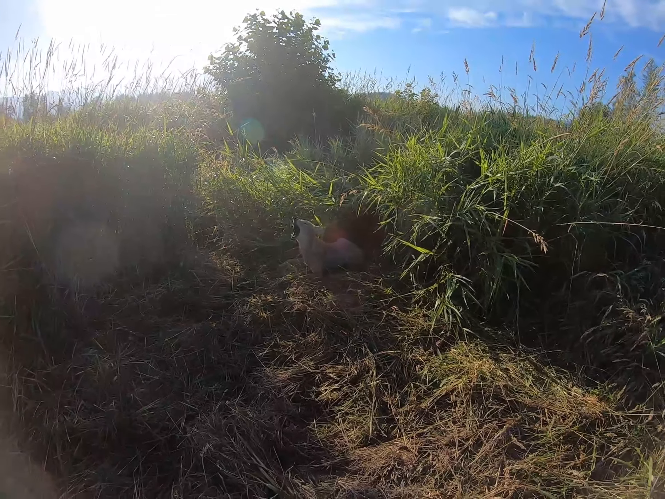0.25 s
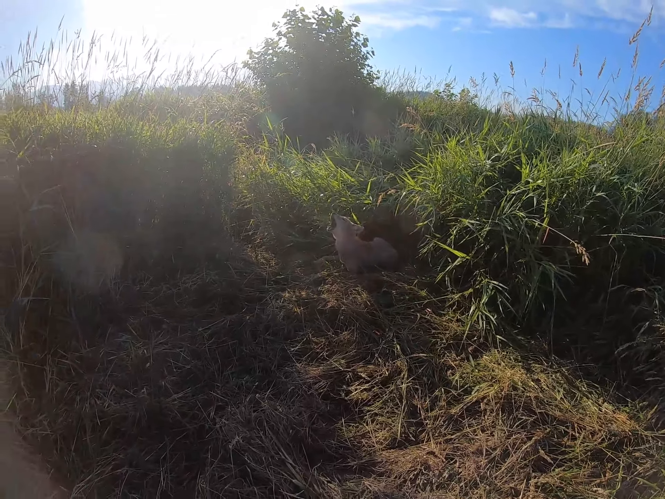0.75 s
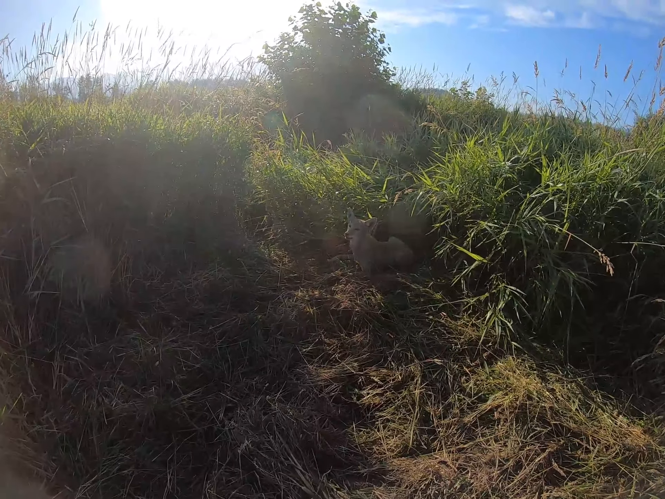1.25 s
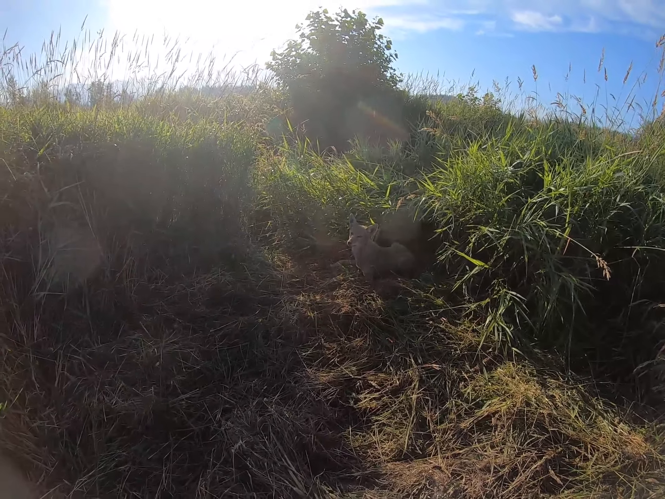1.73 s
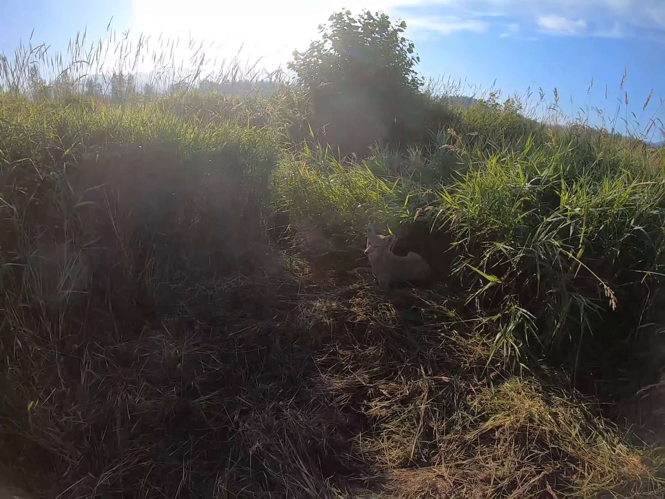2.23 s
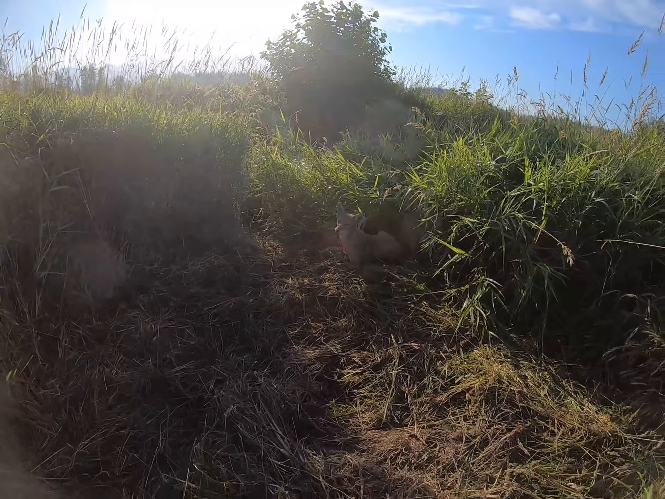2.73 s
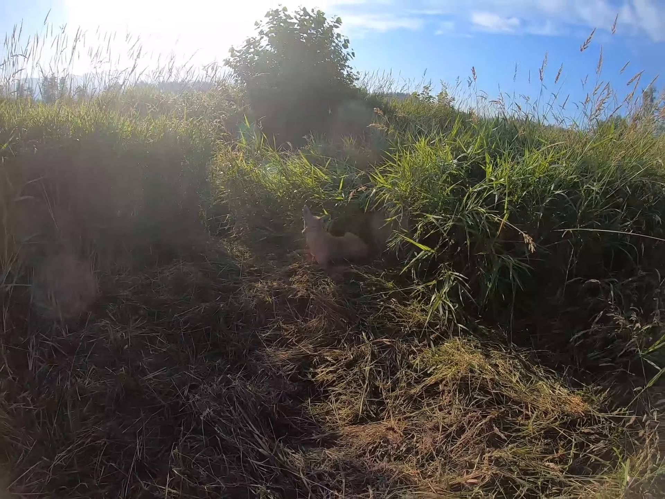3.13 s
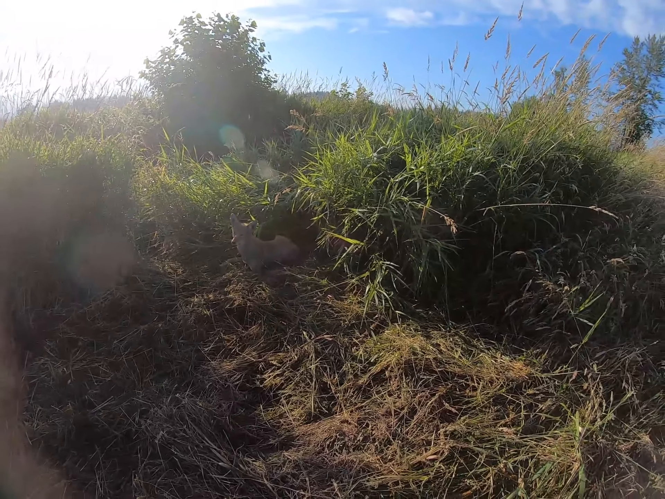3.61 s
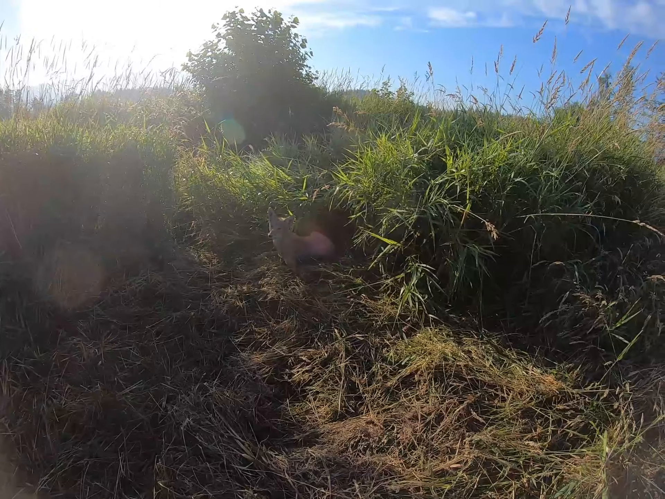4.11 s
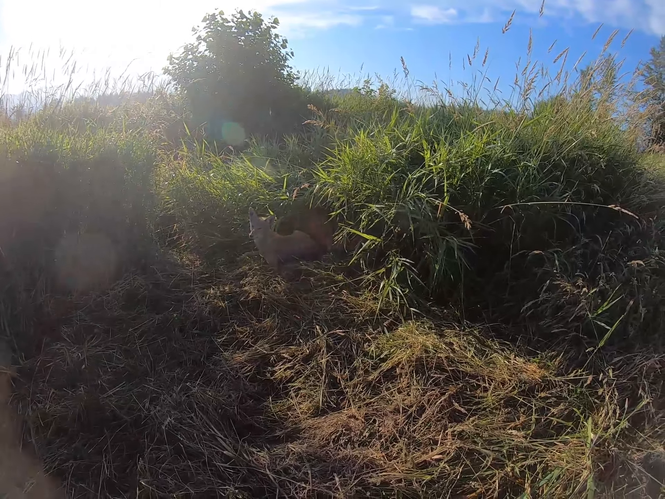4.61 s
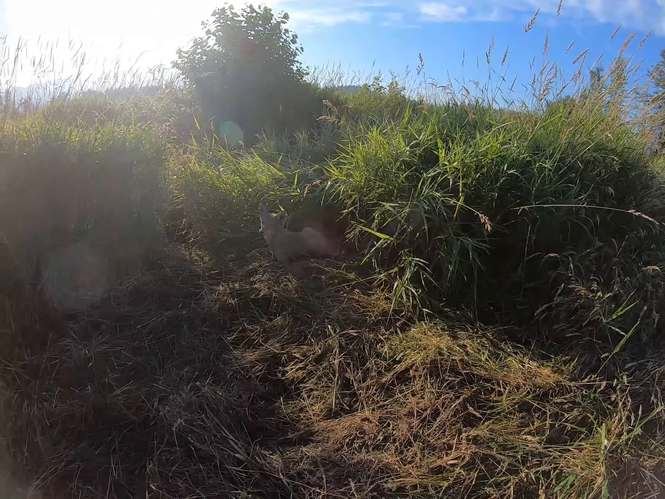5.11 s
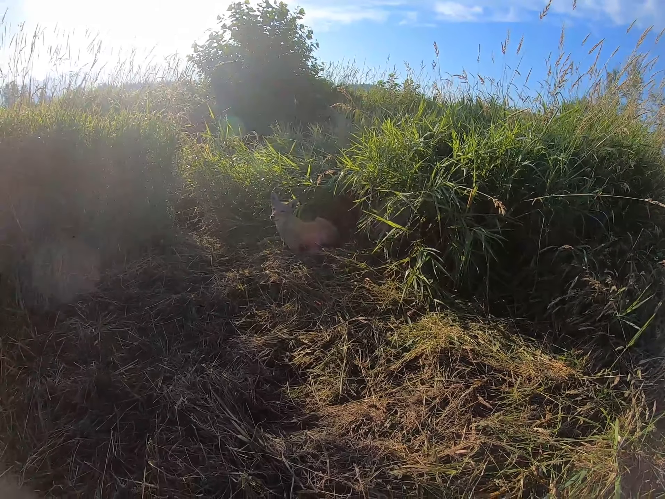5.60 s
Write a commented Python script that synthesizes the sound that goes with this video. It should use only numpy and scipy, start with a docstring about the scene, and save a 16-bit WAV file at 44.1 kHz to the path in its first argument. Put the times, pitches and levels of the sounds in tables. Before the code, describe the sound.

A nearby coyote ends a high howl with a falling yodel, then clicks, thumps and rubbing of a handled microphone follow in a quiet field.

```python
"""Tall grass in an open field, a small hand-held camera, a coyote a few metres off. It ends a howl with
a yodel, its harmonics jumping between registers, and the hedges return a faint echo. Right at the
microphone the hand shifts: skin rubs and ticks on the case, thumps and rumble come through the body.
Far off, animals howl and birds chirp over the hiss of the field; a low hum glides in at the end.
The camera fades between one centred channel and its two microphone ports."""
import sys
import numpy as np
from scipy import signal
from scipy.fft import rfft, irfft
from scipy.io import wavfile
from scipy.ndimage import uniform_filter1d

SR = 44100
rng = np.random.default_rng(int(sys.argv[2]) if len(sys.argv) > 2 else 0)


def to_wav(sig):
    """Store sig (one row per channel, or 1-D mono) as 16-bit WAV at the path in sys.argv[1].

    Samples outside -1..1 are clipped; the rate is SR.
    """
    pcm = np.clip(np.atleast_2d(sig), -1, 1) * 32767
    pcm = np.round(pcm).astype(np.int16)
    wavfile.write(sys.argv[1], SR, pcm.T)  # frames by channels


N = 258137

# The camera's fade. Each row: time in seconds, share of the two ports from 0 to 1.
PORT_SHARE = [(0, 0), (.45, 0), (1.2, 0.35), (1.7, 1), (2.45, 0.03), (4.5, 0), (5.0, 0.56), (5.3, 0.97)]
# The coyote's arcs of pitch, each lasting until the next.
# Each row: start in seconds, pitch at start, middle and end in Hz, effort in dB.
HOWL_ARCS = [(0, 835, 874, 922, 4), (.064, 1206, 1246, 1233, 4.5), (.503, 1234, 1264, 1238, 1),
             (.559, 1238, 1256, 1216, 0), (.641, 1216, 1240, 1256, 0), (.672, 1256, 1266, 1247, -3.5),
             (.727, 1247, 1190, 1158, -.5), (.77, 1158, 1170, 1196, -.5), (.85, 1196, 1162, 1070, 1.5),
             (.899, 745, 690, 600, -2), (.943, 562, 553, 550, 0), (.969, 636, 652, 680, 0),
             (1.008, 807, 898, 775, .5), (1.059, 750, 655, 499, 2), (1.086, 490, 345, 300, 0)]
# The throat favours the 1st or 2nd harmonic: pitches in Hz, then each one's gain there in dB.
THROAT_HZ = [300, 400, 500, 555, 600, 680, 745, 810, 910, 1070, 1155, 1195, 1260]
FIRST_DB = [-55, -43.5, -34, -26, -24, -11.5, -19.5, -25, -26.5, -18.5, -11.5, -13, -11.5]
SECOND_DB = [-48, -32, -35.5, -16, -24, -37, -32, -14.5, -17, -17, -27.5, -28, -36.5]
# The voice from the 3rd harmonic up. Each row: frequency in Hz, relative level in dB.
OVERTONES = [(1600, -21.5), (2200, -12), (2700, -24.5), (3480, -51.5), (3720, -41.5), (5000, -52.5),
             (6200, -49), (7400, -60), (8700, -53), (11300, -88), (13700, -78), (16500, -94.5)]
HOWL_END_S, JUMP_S, RASP_S, RASP_DB = 1.15, .006, 1.07, 14
BREATH_DB, AIR_DB, YODEL_EDGE_DB, THINNING_DB_PER_S = -41, -60.5, 14, 24.5
# Spectrum of the far hiss. Each row: frequency in Hz, relative level in dB.
FIELD_SPECTRUM = [(60, -24), (150, 6), (750, 0), (2300, -10), (6660, -29), (13000, -72)]
# Jolts to the camera body. Each row: start in seconds, hold in seconds, relative level in dB.
JOLTS = [(0.48, 0.031, -41.5), (1.173, 0.17, -40), (1.805, 0.0094, -21.5), (2.663, 0.052, -38.5),
         (2.921, 0.031, -31.5), (3.351, 0.023, -30), (3.708, 0.023, -28.5), (4.1, 0.089, -38.5),
         (4.523, 0.12, -42), (4.747, 0.11, -30), (5.024, 0.11, -39), (5.258, 0.2, -35.5),
         (5.628, 0.036, -35)]
JOLT_RISE_DB_PER_S, JOLT_FALL_DB_PER_S, STILL_DB = 597, 148.5, -61.5
# The resting hand's faint rubbing. Each row: time in seconds, relative level in dB.
RESTING_HAND = [(1.1, -59.5), (1.45, -73.5), (2.45, -68), (2.8, -60.5), (3.55, -53), (4.15, -47),
                (4.35, -60), (5.2, -58), (5.86, -43.5)]
# Skin swishing over the case.
# Each row: start and length in seconds, relative treble and midrange levels in dB.
SWISHES = [(1.29, 0.035, -56.5, -43.5), (1.823, 0.054, -44.5, -33.5), (1.957, 0.076, -66, -57.5),
           (2.591, 0.075, -56, -65.5), (2.844, 0.13, -54.5, -51), (2.991, 0.018, -35.5, -31),
           (3.347, 0.034, -37.5, -41), (3.688, 0.063, -60, -49), (3.902, 0.072, -43.5, -47),
           (4.2, 0.045, -40.5, -44), (4.26, 0.02, -45, -40), (4.538, 0.049, -45.5, -47),
           (4.673, 0.1, -40.5, -41.5), (4.797, 0.044, -41, -41.5), (4.977, 0.018, -46.5, -40.5),
           (5.084, 0.083, -45.5, -39.5), (5.238, 0.023, -48.5, -37.5), (5.291, 0.1476, -41, -37.5),
           (5.441, 0.16, -33, -34.5), (5.603, 0.11, -50, -44.5), (5.685, 0.084, -42, -37),
           (5.802, 0.055, -52, -45)]
# Ticks on the case. Each row: start in seconds, relative treble and midrange levels in dB.
TICKS = [(1.3634, -42, -32.5), (1.436, -51.5, -63), (1.5488, -55, -65), (1.7401, -44.5, -41),
         (1.8176, -16.5, -20.5), (1.8497, -17.5, -5.5), (1.8564, -14.5, -46), (1.8622, -23.5, -36),
         (1.883, -31, -53.5), (1.9143, -42.5, -58), (2.0562, -44.5, -75.5), (2.211, -49, -61),
         (2.9375, -29, -29.5), (3.0002, -41, -39), (3.07, -38.5, -39.5), (3.1463, -35, -31.5),
         (3.264, -32, -36), (3.7, -30.5, -28.5), (3.765, -32, -30), (4.108, -34, -41),
         (4.122, -25.5, -34.5), (4.146, -38, -29), (4.161, -33, -52), (4.2083, -17, -28.5),
         (4.4436, -38, -36.5), (4.5695, -26, -45), (4.812, -23, -57), (5.315, -26.5, -38),
         (5.3735, -23.5, -35), (5.3803, -24, -46), (5.4364, -22, -33), (5.688, -35, -26),
         (5.7404, -36, -51), (5.822, -35, -51)]
# Resonances of the case at centre and left, of the case on the right, and of the body.
# Each row: frequency in Hz, width in Hz, relative level in dB.
CASE_MODES = [(2401, 760, 0.5), (3870, 1200, -3.5), (6850, 440, -16.5), (8440, 600, -13.5),
              (9520, 1000, -13.5), (12600, 3200, -50)]
RIGHT_MODES = [(2823, 580, -8), (4070, 240, -10), (4996, 1300, -10.5), (6238, 740, -6), (6840, 470, -0.5),
               (9710, 1750, -12), (11700, 570, -21.5)]
BODY_MODES = [(218.4, 434, 3), (656.5, 475, 3.5), (1282, 1020, -5.5)]
CORE_NARROWER, CORE_DB = 7, 6  # each resonance has a thin core that rings on
# Far animals. Each row: start and length in seconds, pitch at start and end in Hz, level in dB.
FAR_HOWLS = [(1.12, .63, 1240, 1140, -67), (1.14, .22, 2440, 2500, -67), (1.48, .27, 1720, 1690, -69),
             (1.9, .5, 760, 750, -70), (1.94, .34, 2340, 2310, -69), (2.2, .6, 1200, 1380, -72),
             (2.4, .88, 850, 870, -66), (3.47, .25, 1040, 1060, -57)]
# Thuds through the body. Each row: start in seconds, starting level in dB, pitch in Hz.
THUDS = [(1.368, -25, 197), (1.845, -7.5, 108), (4.119, -13, 222), (4.836, -17.5, 221), (5.254, -25, 294)]
# Far birds. Each row: start and length in seconds, pitch at start, middle and end in Hz, level in dB.
BIRDS = [(2.02, .065, 3280, 3700, 4700, -76), (2.245, .115, 5800, 4300, 2950, -78),
         (3.49, .11, 6000, 5720, 5800, -74), (1.61, .065, 3280, 3700, 4700, -77)]
# The low hum. Each row: time in seconds, pitch in Hz, base level in dB.
HUM = [(5.28, 74.2, -49), (5.35, 91.4, -37), (5.41, 78.9, -40), (5.5, 62.3, -58), (5.86, 69.6, -40.5)]
# Its first three harmonics, in dB above the base level.
HUM_HARMONICS_DB = [-21, 5.5, -1]


def undb(db):
    """Decibels to gain."""
    return 10 ** (np.asarray(db) / 20)


def unit(x):
    """Scaled to rms 1."""
    return x / np.sqrt(np.mean(x ** 2))


def band(x, lo_hz, hi_hz, order=2):
    """Band-pass."""
    return signal.sosfilt(signal.butter(order, [lo_hz, hi_hz], "band", fs=SR, output="sos"), x)


def hiss(lo_hz, hi_hz):
    """A steep-sided band of noise."""
    return band(rng.standard_normal(N), lo_hz, hi_hz, order=4)


def walk(rate):
    """A line through random values, rate of them a second; rms 1."""
    step = int(SR / rate)
    held = np.repeat(rng.standard_normal(N // step + 1), step)
    return unit(uniform_filter1d(held, step)[:N])


def curve(rows):
    """A gate that is open while a table lasts, then its columns on the sample grid."""
    s, *columns = np.transpose(rows)
    gate = np.interp(T, [s[0] - .012, s[0], s[-1], s[-1] + .012], [0, 1, 1, 0])
    return gate, *(np.interp(T, s, c) for c in columns)


def arc(u, start, middle, end):
    """Parabola through three values, u from 0 to 1."""
    return start * (1 - u) * (1 - 2 * u) + 4 * middle * u * (1 - u) + end * u * (2 * u - 1)


def throat():
    """The coyote's gate, pitch and two lowest harmonics in dB; the voice dips as the pitch jumps."""
    s, start, middle, end, effort = np.transpose(HOWL_ARCS)
    edges = np.append(s, HOWL_END_S)
    k = np.clip(np.searchsorted(edges, T, side="right") - 1, 0, len(s) - 1)
    u = np.clip((T - edges[k]) / np.diff(edges)[k], 0, 1)
    glide = lambda x: uniform_filter1d(x, int(JUMP_S * SR), mode="nearest")
    hz = glide(arc(u, start[k], middle[k], end[k]))
    jump_speed = glide(np.abs(np.gradient(np.log(hz))) * SR)
    push_db = np.interp(T, s, effort) - .1 * jump_speed
    thinning_db = THINNING_DB_PER_S * T * np.clip((hz - 1150) / 50, 0, 1)  # high register only
    first_db = push_db + np.interp(hz, THROAT_HZ, FIRST_DB)
    second_db = push_db + np.interp(hz, THROAT_HZ, SECOND_DB) - thinning_db
    gate = np.clip((HOWL_END_S + .0131 - T) / .0087, 0, 1)
    return gate, hz, first_db, second_db


def coyote(ports):
    """A few metres off: a clean stack of harmonics with a little breath, and its echo."""
    gate, hz, first_db, second_db = throat()
    phase = 2 * np.pi * np.cumsum(hz * (1 + .002 * walk(40))) / SR
    low = np.sqrt(2) * (undb(first_db) * np.sin(phase) + undb(second_db) * np.sin(2 * phase))
    loudness = np.hypot(undb(first_db), undb(second_db))
    waver_db = [3 * walk(40) + 2.5 * walk(250) for _ in range(15)]
    # The top of the low register is harsher around 6 kHz.
    edge_db = YODEL_EDGE_DB * np.clip(np.minimum(1100 - hz, hz - 700) / 100, 0, 1)
    tiring = np.interp(T, [0, .9], [2.5, -3])  # duller above 2.4 kHz as the effort drops
    high = 0
    for k in range(3, 15):
        db = np.interp(k * hz, *np.transpose(OVERTONES)) + waver_db[k]
        db += edge_db * np.exp(-((k * hz - 6100) / 1000) ** 2)
        db += tiring * np.sqrt(np.maximum(k * hz / 1000 - 2.4, 0))
        high += undb(db) * np.sin(k * phase)
    rasp_db = RASP_DB * np.clip((T - RASP_S) / .04 + .5, 0, 1)  # the voice breaks up as it falls
    breath = undb(BREATH_DB + rasp_db) * unit(hiss(900, 3100))
    voice = gate * (low + loudness * breath)
    hoarse_db = rasp_db + np.interp(T, [.88, 1.01], [-60, -43])  # air hisses most in the yodel
    hoarse = undb(hoarse_db) * unit(hiss(5200, 7000) + .5 * hiss(8200, 9400))
    air = undb(AIR_DB) * unit(hiss(3400, 6400))
    treble = gate * loudness * (high + hoarse + air)
    side = ports * np.array([[-1], [1]])  # the right port is the louder, most in the treble
    return voice * (1 + .45 * side) + treble * (1 + .6 * side) + hedge_echo(voice + treble, ports)


def hedge_echo(call, ports, level_db=-19.5, t60_s=.12):
    """Scattered reflections off the hedges, dying away at each port."""
    t = np.arange(int(t60_s * SR)) / SR
    tail = rng.standard_normal((2, len(t))) * undb(-60 * t / t60_s) * np.minimum(t / .03, 1)
    tail /= np.sqrt(np.sum(tail ** 2, axis=1, keepdims=True))
    left, right = signal.fftconvolve(call[None], undb(level_db) * tail)[:, :N]
    return np.array([left, left + ports * (right - left)])


def field_hiss(ports):
    """The far hiss of the open field, fainter under the start of the howl."""
    hz, db = np.transpose(FIELD_SPECTRUM)
    shape = undb(np.interp(np.log(np.fft.rfftfreq(N, 1 / SR) + 1), np.log(hz), db))
    mid, side = (unit(irfft(rfft(rng.standard_normal(N)) * shape, N)) for _ in range(2))
    level_db = -66.5 + np.interp(T, [.4, .6], [-9, 0]) + walk(24)
    return undb(level_db) * (mid + .88 * ports * side * np.array([[1], [-1]]))


def body_rumble(ports):
    """Jolts shake the camera body: each rumble rises fast, holds and dies away."""
    jolts_db = [db - JOLT_RISE_DB_PER_S * np.maximum(s - T, 0)
                - JOLT_FALL_DB_PER_S * np.maximum(T - s - hold, 0) for s, hold, db in JOLTS]
    swell = undb(np.maximum(np.max(jolts_db, axis=0), STILL_DB) + 2 * walk(11))
    noise = np.sign(rng.standard_normal((2, N)))
    shared = swell * unit(band(noise[0], 9.2, 59))
    opposed = swell * unit(band(noise[1], 7.1, 110))
    pair = np.array([.5 * shared + opposed, 2.2 * shared - .99 * opposed])
    return (1 - ports) * shared + ports * pair


def hand_on_case(ports):
    """Right at the microphone: skin sticks and slips, and slips and ticks ring the same modes."""
    gate, rest_db = curve(RESTING_HAND)
    noise = np.sign(rng.standard_normal((3, N)))
    slip = unit(undb(2.6 * walk(45) + 1.5 * walk(300)))
    releases = (rng.random(N) < 70 / SR) * undb(16 + 2.5 * rng.exponential(size=N))
    crackle = signal.lfilter([1], [1, -.97], releases)
    rest = gate * undb(rest_db + 2.5 * walk(14))
    treble = (slip * swishes(column=2) * (1 + .15 * crackle) + undb(-16.5) * rest * crackle) * noise[0]
    treble += .95 * band(ticks(column=1, t60_s=.012) * noise[0], 1700, 8700)  # nail or stalk: duller
    treble += undb(-8.5) * band(rest * noise[2], 1300, 4900)  # the resting hand sounds dull
    treble = band(treble, 300, 13000)
    midrange = slip * swishes(column=3) + rest + 1.69 * ticks(column=2, t60_s=.015)
    case = ring(treble, CASE_MODES)
    body = ring(midrange * noise[1], BODY_MODES)
    body_right = ring(midrange * (.082 * noise[1] + noise[2]), BODY_MODES)
    left = undb(-1) * case + undb(9) * band(treble, 8300, 9900) + .65 * body
    right = undb(10.5) * ring(treble, RIGHT_MODES) + .65 * body_right
    return (1 - ports) * (case + body) + ports * np.array([left, right])


def ring(drive, modes):
    """The camera's resonances, neighbours in opposite phase; white noise keeps its level."""
    kick = np.eye(1, 4096)[0]
    mode = lambda hz, width: band(kick, hz - width / 2, hz + width / 2, order=1)
    response = sum((-1) ** k * undb(db) * (mode(hz, w) + undb(CORE_DB) * mode(hz, w / CORE_NARROWER))
                   for k, (hz, w, db) in enumerate(modes))
    return signal.fftconvolve(drive, response / np.sqrt(np.sum(response ** 2)))[:N]


def far_call(u, hz, db):
    """One distant tone that swells and fades as u runs from 0 to 1."""
    swell = np.sqrt(np.abs(np.sin(np.pi * u))) * (u < 1)
    return swell * undb(db) * np.sin(2 * np.pi * np.cumsum(hz) / SR)


def far_howls():
    """Animals far off, hoarse with distance: wavering tones, each blurred into a narrow band."""
    out = 0
    for s, length, start, end, db in FAR_HOWLS:
        u = np.clip((T - s) / length, 0, 1)
        hz = (start + (end - start) * u) * (1 + .016 * walk(70))
        out += far_call(u, hz, db + 5 * walk(70))
    return out


def swishes(column, rise_s=.013, fade_s=.003):
    """Envelope of skin sliding over the case: a soft start, a hold, a trailing fade."""
    held = sum(undb(row[column]) * ((T > row[0]) & (T < row[0] + row[1])) for row in SWISHES)
    pole, rise = np.exp(-1 / fade_s / SR), int(rise_s * SR)
    return signal.lfilter([1 - pole], [1, -pole], uniform_filter1d(uniform_filter1d(held, rise), rise))


def ticks(column, t60_s):
    """Envelope of the ticks on the case: a sudden start and a quick fade."""
    rows = np.array(TICKS)
    hits = np.zeros(N)
    np.add.at(hits, (rows[:, 0] * SR).astype(int), undb(rows[:, column]))
    return signal.lfilter([1], [1, -undb(-60 / t60_s / SR)], uniform_filter1d(hits, size=60))


def thumps(t60_s=.029):
    """Thuds reach the microphone as damped swings of the camera body."""
    out = 0
    for s, db, hz in THUDS:
        age = np.maximum(T - s, 0)
        out += undb(db - 60 * age / t60_s) * np.sin(2 * np.pi * hz * age)
    return out


def far_birds():
    """Short gliding whistles; distance and leaves make the level flicker."""
    out = 0
    for s, length, start, middle, end, db in BIRDS:
        u = np.clip((T - s) / length, 0, 1)
        out += far_call(u, arc(u, start, middle, end), db + 5 * walk(90))
    return out


def low_hum():
    """Three harmonics on a low, gliding pitch."""
    gate, hz, db = curve(HUM)
    phase = 2 * np.pi * np.cumsum(hz) / SR
    harmonics = sum(undb(db + d) * np.sin(k * phase) for k, d in enumerate(HUM_HARMONICS_DB, 1))
    return np.sqrt(2) * gate * harmonics


def scene():
    """The near coyote, the handling noise and the background, as heard at the camera."""
    ports = np.clip(curve(PORT_SHARE)[1], 0, 1)
    near = coyote(ports) + body_rumble(ports) + hand_on_case(ports) + thumps()
    return near + field_hiss(ports) + far_howls() + far_birds() + low_hum()


def record(dry, top_hz=15700):
    """The camera cuts the top of the treble steeply."""
    return signal.sosfilt(signal.ellip(8, .2, 70, top_hz, fs=SR, output="sos"), dry)


T = np.arange(N) / SR  # time in seconds

dry = scene()
out = record(dry)
to_wav(out)
```